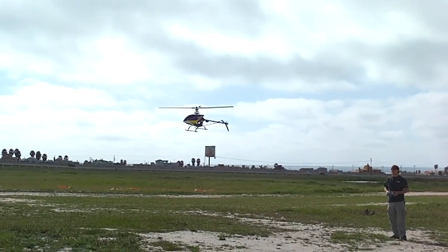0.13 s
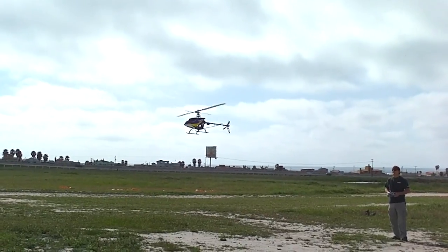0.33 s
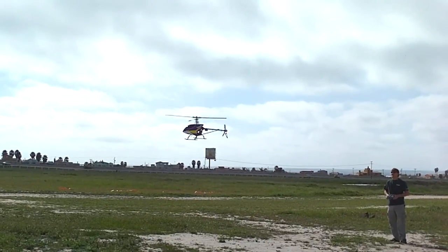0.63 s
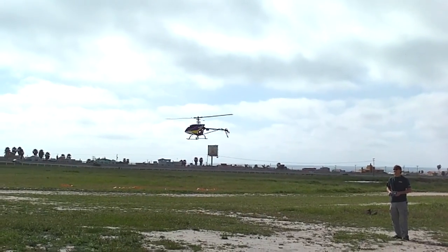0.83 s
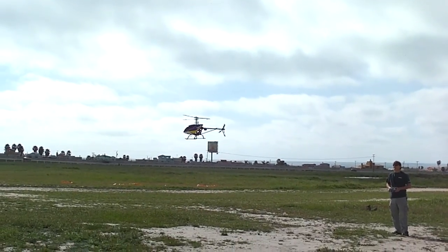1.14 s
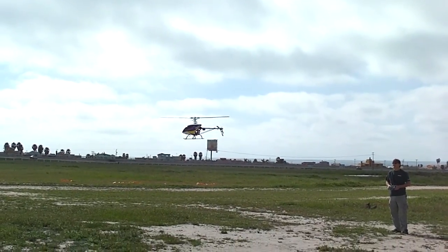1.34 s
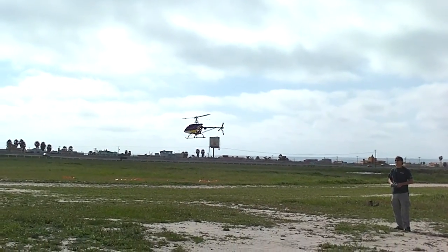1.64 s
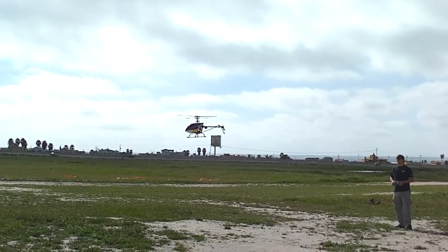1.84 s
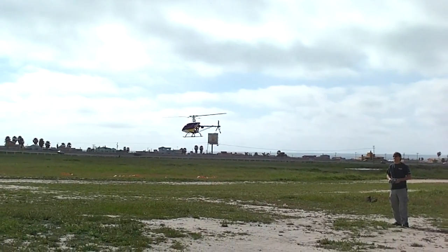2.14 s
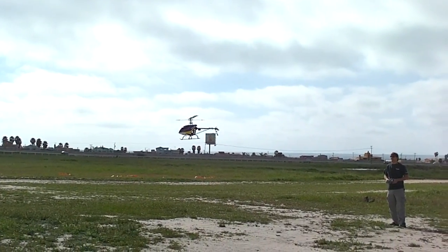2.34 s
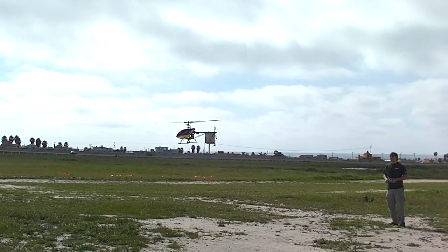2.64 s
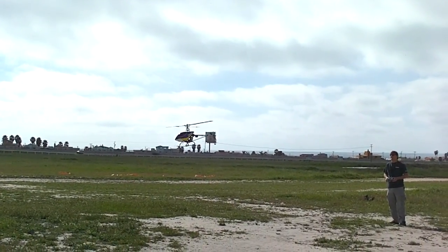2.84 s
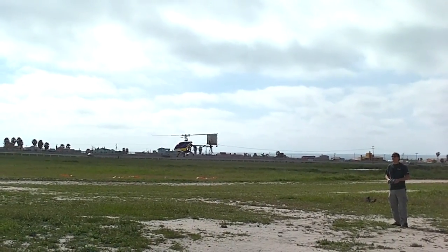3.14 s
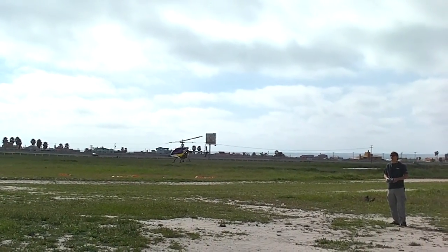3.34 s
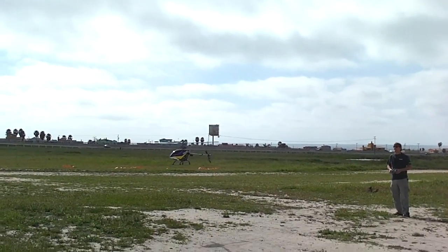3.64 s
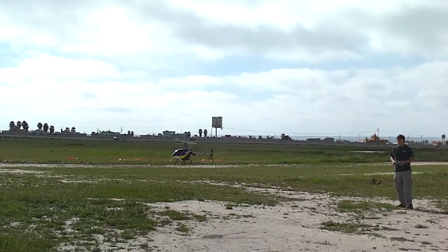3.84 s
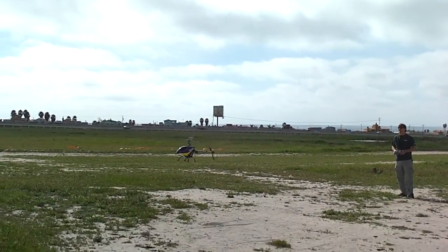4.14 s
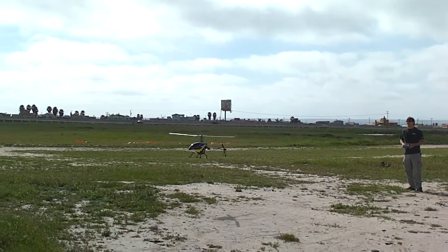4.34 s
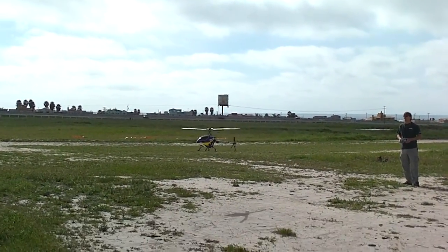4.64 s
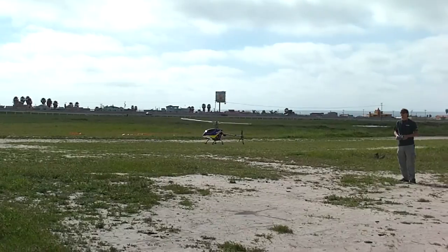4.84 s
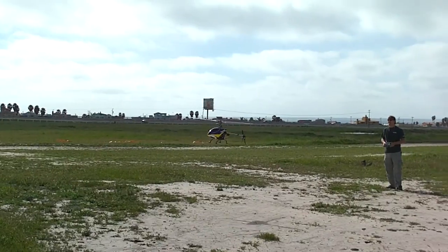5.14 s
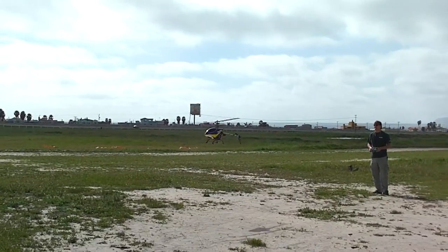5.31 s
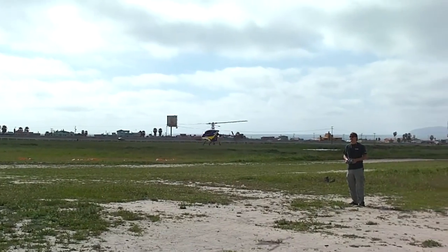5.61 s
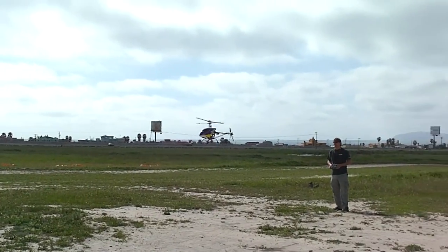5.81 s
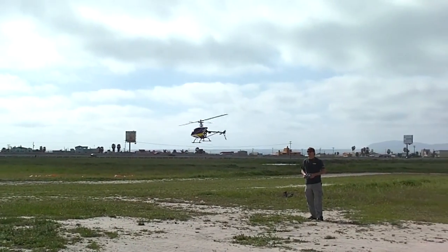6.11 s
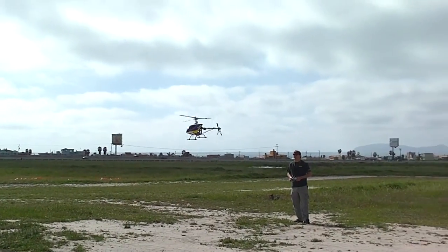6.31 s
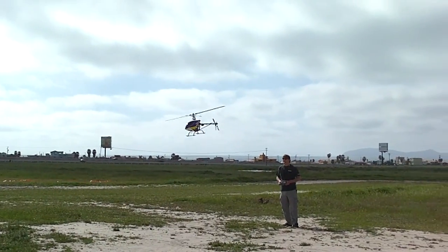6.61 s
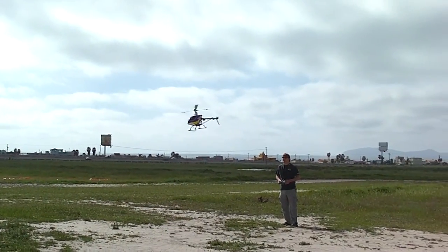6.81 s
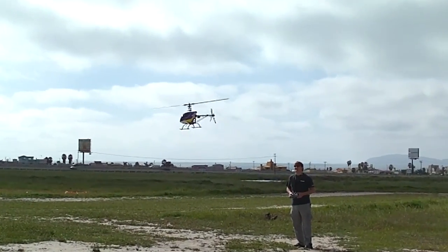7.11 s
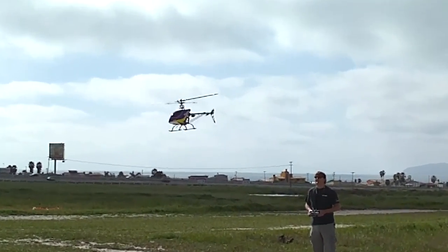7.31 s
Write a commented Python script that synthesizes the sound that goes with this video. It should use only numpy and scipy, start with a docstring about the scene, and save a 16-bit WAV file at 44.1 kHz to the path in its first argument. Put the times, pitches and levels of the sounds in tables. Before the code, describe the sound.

An electric model helicopter whines and throbs over an open field, with light wind and a few hard knocks on the microphone.

```python
"""An electric model helicopter hovers over an open field while wind buffets a mono microphone.
Its pinion whines against the main gear, throbbing with every rotor turn. Near 3 s the camera is knocked.
The craft sinks almost to the grass: from about 4 s the unloaded rotor speeds up and its blades whistle,
and at 5 s a hard knock overloads the input. The rotor slows and the whistle fades as the craft climbs
again; two more hard knocks fall near 7 s."""
import sys
import numpy as np
from scipy import signal
from scipy.fft import rfft, irfft
from scipy.io import wavfile

SR = 44100
rng = np.random.default_rng(int(sys.argv[2]) if len(sys.argv) > 2 else 0)


def to_wav(s):
    """Save 16-bit WAV."""
    ch = np.atleast_2d(s).T  # columns
    pcm = np.round(np.clip(ch, -1, 1) * 32767)  # PCM
    wavfile.write(sys.argv[1], SR, pcm.astype(np.int16))


N = 328986
TIME = np.arange(N) / SR
GEAR_TEETH, PINION_TEETH = 170, 15

# Spectra of wind rumble, rotor wash and rotor hiss: frequency_hz, relative_density_db
WIND_SPECTRUM = [(10, -2), (30, -10), (60, 1), (130, 1), (190, -6.5), (300, -7.5), (600, -24), (1500, -23),
                 (5000, -77)]
WASH_SPECTRUM = [(150, -10), (300, -13.5), (450, -8), (600, 3.5), (820, 2.5), (1000, -7.5), (1250, -18.5),
                 (1750, -23), (2100, -11), (2800, -34), (3400, -41)]
HISS_SPECTRUM = [(1500, -19), (2100, -2.5), (3000, -10), (3450, -12.5), (3750, 1), (4500, -0.5),
                 (5900, 10.5), (6500, 0), (7200, 5.5), (9500, -1.5), (11500, -1.5), (12500, -2),
                 (14200, -12), (15300, -7)]
# Gusts on the microphone: start_s, level_db, rise_s, decay_s, cutoff_hz
WIND_GUSTS = [(0, -33, 0.0054, 0.11, 190), (0.139, -30.5, 0.03, 0.049, 240),
              (2.219, -33, 0.054, 0.061, 177), (2.45, -33, 0.015, 0.068, 230), (2.9, -35, 0.023, 0.11, 330),
              (3.017, -12.5, 0.0031, 0.008, 360), (3.463, -28.5, 0.0051, 0.01, 400),
              (4.779, -37, 0.031, 0.066, 130)]
# Dull pushes on the camera: crest_s, level_db, pitch_hz, half_length_s
CAMERA_BUMPS = [(2.9798, -14, 230, .0035), (3.0171, -5, 240, .0019), (5.0365, -14, 210, .0025),
                (6.8395, -13, 190, .0025)]
# Modes of the camera body: pitch_hz, relative_db, base_t60_s
BODY_MODES = [(521, -14, 0.034), (763, -13.5, 0.03), (890, -7.5, 0.021), (1237, -8.5, 0.037),
              (1380, -28, 0.12), (1800, -14.5, 0.053), (2275, 5, 0.019), (2220, -24, 0.15),
              (2560, -2, 0.011), (2964, -6, 0.021), (3370, 4, 0.019), (3750, -31, 0.15), (3747, 3.5, 0.014),
              (4590, 0.5, 0.0063), (4980, -2, 0.0054), (6800, -33, 0.0067), (8400, -5, 0.01)]
# Blows on the camera: start_s, gain_db, ring_factor, cutoff_hz, rattle_s, low_mode_gain_db
CAMERA_KNOCKS = [(2.9053, -19, 0.27, 1230, .001, -2), (2.9793, -3, 0.25, 13000, 0.00062, 2.5),
                 (3.0166, -7, 0.17, 4500, 0.013, 5), (4.367, -29, 0.55, 1400, .001, 3),
                 (4.5863, -27.5, 0.92, 1100, 0.00081, 10.5), (5.0337, 9.5, 0.54, 3640, 0.00041, -4.5),
                 (6.837, 5, 0.71, 4060, 0.0012, 2.5), (7.339, 5.5, 0.93, 5070, .002, 4)]
# Main rotor speed, rising as the load comes off: time_s, turns_per_s
ROTOR_SPEED = [(0.0, 16.044), (0.3, 15.78), (1.0, 15.766), (2.0, 15.715), (2.75, 15.749), (3.25, 16.037),
               (3.87, 16.273), (4.25, 16.692), (4.75, 16.856), (5.35, 16.463), (6.3, 15.907),
               (6.85, 15.851), (7.46, 15.628)]
# Hum partials of main and tail rotor: cycles_per_rotor_turn
ROTOR_ORDERS = (4, 6, 8, 9, 18, 27, 36, 40.5)
# Their strengths: level_db
ROTOR_ORDER_LEVELS = [-60, -54.5, -57.5, -54.5, -59.5, -63, -68, -60.5]
# Rotor wash, following the lift: time_s, relative_db
WASH_ENVELOPE = [(0.0, -39.5), (0.62, -42), (2.51, -43.5), (3.03, -40), (4.78, -47), (5.74, -47),
                 (6.42, -42.5), (7.08, -45.5), (7.46, -43.5)]
# Blade whistles: loudest_at_turns, highest_at_turns, top_pitch_hz, width_hz, relative_db
BLADE_WHISTLES = [(.11, .17, 6100, 170, 3.5), (.58, .65, 6450, 200, 2.5), (.66, .7, 7800, 900, -2),
                  (.3, .3, 7200, 800, -5)]
# Whistling of the unloaded blades: time_s, gain_db
WHISTLE_ENVELOPE = [(4.15, -60), (4.3, -37), (4.45, -32.5), (4.75, -34.5), (5, -31), (5.25, -30),
                    (5.4, -37), (5.7, -42), (6.3, -45), (6.6, -60)]
# Partials of the uneven pinion: cycles_per_motor_turn
PINION_ORDERS = (3, 12, 13, 16, 27, 28, 29, 31, 42, 43, 44, 45, 46, 47, 48, 54, 57, 59, 61, 74, 75)
# Their strengths: relative_db
PINION_ORDER_LEVELS = [-26.5, -25.5, -24.5, -30.5, -13, -16.5, -7, -28, -16.5, -11.5, -6, -5.5, -11, -23,
                       -11, -34, -12, -14, -10.5, -14, -10.5]
# Friction bands around mesh harmonics 1 to 5: width_hz, relative_db
FRICTION_BANDS = [(343, -6.5), (710, -8), (1090, -2.5), (830, -11.5), (450, -14)]
# Gear rasp, weaker as the craft sinks: time_s, relative_db
RASP_ENVELOPE = [(0.0, -28.5), (0.29, -28), (2.66, -33.5), (2.83, -29.5), (3.16, -31.5), (3.49, -30),
                 (4.15, -34.5), (5.11, -34.5), (5.4, -33), (7.08, -30), (7.46, -28.5)]
# The sideband just below the mesh tone: time_s, level_db
SIDEBAND_ENVELOPE = [(0.0, -40), (0.1, -46), (0.95, -37.5), (1.45, -54.4), (3.25, -35.5), (3.81, -42.8),
                     (4.01, -36), (5.06, -48.5), (5.86, -38.5), (6.21, -48.5), (7.46, -64)]
# Tones of the whine: multiple_of_mesh_frequency
WHINE_HARMONICS = (1, 2, 4)
# Each of the three beams its own way as the craft turns: time_s, relative_db
LOW_ENVELOPE = [(0.0, -30.5), (0.15, -33), (1.1, -24.5), (1.75, -32.5), (2.6, -31.5), (2.9, -27),
                (4.21, -34), (4.41, -28), (5.21, -40), (5.36, -30.5), (5.71, -27.5), (6.06, -44.5),
                (6.16, -35), (6.41, -31.5), (7.46, -32)]
MID_ENVELOPE = [(0.0, -24.5), (0.7, -26.5), (0.85, -37.5), (1.0, -27), (1.15, -24), (1.45, -33.5),
                (1.9, -27.5), (3.1, -28), (3.45, -23.4), (3.65, -31), (3.86, -25.5), (4.06, -41),
                (4.26, -33.2), (4.61, -34), (5.01, -39.5), (5.11, -33), (6.56, -25), (7.46, -29.5)]
HIGH_ENVELOPE = [(0.0, -52), (0.95, -43.8), (2.35, -49), (3.35, -37), (4.11, -42), (4.41, -55),
                 (4.66, -50.1), (4.96, -70), (5.31, -40), (6.66, -36.3), (7.46, -53)]
# Pulsing of the lowest mesh tone with the angle of view: time_s, swing_db, loudest_at_turns
LOW_THROB = [(0, 6, 0.21), (.8, 3, 0.09), (1.5, 5, .15), (2.8, 2.5, -0.078), (3.6, 5.5, 0.16),
             (4.3, 4, -.22), (5.7, 3, -0.2), (6.3, 4, 0.25), (7.46, 7, 0.18)]


def gain_of(db):
    """Amplitude grows tenfold with every 20 dB."""
    return 10 ** (np.asarray(db) / 20)


def unit_rms(x):
    """Normalisation to unit mean power."""
    return x / np.sqrt(np.mean(abs(x) ** 2) + 1e-20)


def curves(rows):
    """Linear interpolation of a time table's columns at every sample."""
    times, *columns = np.transpose(rows)
    return [np.interp(TIME, times, column) for column in columns]


def add(mix, start_s, sound):
    """Superposition of a sound on the mix from start_s."""
    part = mix[max(round(start_s * SR), 0):][:len(sound)]
    part += sound[:len(part)]


def noise(spectrum):
    """Spectral shaping of white noise, rms 1."""
    hz, db = np.transpose(spectrum)
    shape = gain_of(np.interp(np.log(np.fft.rfftfreq(N, 1 / SR) + 1), np.log(hz), db))
    return unit_rms(irfft(rfft(rng.standard_normal(N)) * shape, N))


def lowpass(x, hz, order=2):
    """Butterworth roll-off above hz: 6 dB an octave for each order."""
    return signal.sosfilt(signal.butter(order, hz, fs=SR, output="sos"), x)


def drift(hz, step=64):
    """Random fluctuation band-limited to about hz, rms 1."""
    count = N // step + 2
    frequencies = np.fft.rfftfreq(count, step / SR)
    slow = irfft(rfft(rng.standard_normal(count)) / np.sqrt(1 + (frequencies / hz) ** 4), count)
    return np.interp(np.arange(N) / step, np.arange(count), unit_rms(slow))


def narrowband(cycles, width_hz):
    """Random modulation broadens a tone into a band of noise, rms 1."""
    envelope = lowpass(rng.standard_normal(N) + 1j * rng.standard_normal(N), width_hz / 2)
    return unit_rms((envelope * np.exp(2j * np.pi * cycles)).real)


def throb(turns, turn_db, turn_at, blade_db, blade_at):
    """Amplitude modulation by each turn and each of two blades, rms 1; the crests are placed in turns."""
    per_turn = turn_db * np.cos(2 * np.pi * (turns - turn_at))
    per_blade = blade_db * np.cos(4 * np.pi * (turns - blade_at))
    return unit_rms(gain_of(per_turn + per_blade))


def wind(steady_db=-42, lumps_db=0.66):
    """Turbulent pressure on the microphone: a lumpy rumble, and gusts that decay exponentially."""
    out = gain_of(steady_db + lumps_db * drift(hz=14)) * noise(WIND_SPECTRUM)
    t = TIME[:SR // 2]
    for start_s, db, rise_s, decay_s, cutoff_hz in WIND_GUSTS:
        eddies = lowpass(rng.standard_normal(len(t)), cutoff_hz)
        eddies = signal.sosfilt(signal.butter(1, cutoff_hz / 5, "high", fs=SR, output="sos"), eddies)
        shape = np.minimum(t / rise_s, 1) ** 2 * np.exp(-np.maximum(t - rise_s, 0) / decay_s)
        add(out, start_s, gain_of(db) * unit_rms(eddies * shape) * np.sqrt(np.mean(shape ** 2)))
    return out


def bumps():
    """Elastic flexure: a soft push bends the camera body for a cycle or two."""
    out = np.zeros(N)
    for crest_s, db, hz, half_length_s in CAMERA_BUMPS:
        t = TIME - crest_s
        out += gain_of(db) * np.exp(-(t / half_length_s) ** 2) * np.cos(2 * np.pi * hz * t)
    return out


def knocks(rattle_share=0.34, crack_db=-9):
    """Impact excitation: a blow cracks, rattles and rings the camera's modes; soft ones sound duller."""
    out, t = np.zeros(N), TIME[:SR // 4]
    for start_s, db, ring, cutoff_hz, rattle_s, low_mode_db in CAMERA_KNOCKS:
        body = np.zeros(len(t))
        for hz, mode_db, base_t60_s in BODY_MODES:
            envelope = gain_of(mode_db + low_mode_db * (hz < 1100) - 60 * t / (base_t60_s * ring))
            body += envelope * np.sin(2 * np.pi * hz * t) / np.hypot(1, (hz / cutoff_hz) ** 2)
        force = rng.standard_normal(len(t)) * np.exp(-t / rattle_s)
        force *= rattle_share / np.linalg.norm(force)
        force[0] += 1  # the blow itself
        band = signal.butter(2, (300, cutoff_hz), "band", fs=SR, output="sos")
        crack = unit_rms(signal.sosfilt(band, rng.standard_normal(len(t))))
        crack *= gain_of(crack_db) * np.exp(-t / (0.005 * ring))
        add(out, start_s, gain_of(db) * (signal.fftconvolve(force, body)[:len(t)] + crack))
    return out


def controller(switching_hz=11988, level_db=-62):
    """Periodic switching makes the motor's speed controller sing faintly."""
    tone = (1 + 0.4 * drift(hz=5)) * np.sin(2 * np.pi * switching_hz * TIME)
    return gain_of(level_db) * unit_rms(tone)


def rotor_hum(turns):
    """Periodic blade passage gives partials at multiples of the rotor speed."""
    out = np.zeros(N)
    for order, db in zip(ROTOR_ORDERS, ROTOR_ORDER_LEVELS):
        waver = 1 + 0.61 * drift(hz=5.2)
        out += gain_of(db) * unit_rms(waver * np.cos(2 * np.pi * (order * turns + rng.random())))
    return out


def rotor_wash(turns):
    """Turbulence in the air moved by the rotor gives broadband noise, modulated by blade passage."""
    rasp_db = curves(RASP_ENVELOPE)[0]
    hiss = gain_of(-36 + 0.05 * (rasp_db - rasp_db.mean())) * noise(HISS_SPECTRUM)
    wash = gain_of(curves(WASH_ENVELOPE)[0] + 0.58) * noise(WASH_SPECTRUM)
    swish = throb(turns, turn_db=0.84, turn_at=0.51, blade_db=2.0, blade_at=0.28)
    return swish * (hiss + wash)


def blade_whistle(turns, doppler=0.11, focus=5.2):
    """Doppler shift: each blade's whistle sweeps up as it swings toward the listener."""
    out = np.zeros(N)
    for loudest_at, highest_at, top_hz, width_hz, db in BLADE_WHISTLES:
        sweep = doppler * (np.cos(2 * np.pi * (turns - highest_at)) - 1)
        pitch_hz = top_hz * (1 + sweep + 0.024 * drift(hz=11))
        beam = np.exp(focus * (np.cos(2 * np.pi * (turns - loudest_at)) - 1))
        out += gain_of(db) * beam * narrowband(np.cumsum(pitch_hz) / SR, width_hz)
    return out * gain_of(curves(WHISTLE_ENVELOPE)[0])


def teeth_passed(turns, runout_teeth=0.14):
    """Phase modulation: the off-centre main gear advances and retards the mesh once a turn."""
    backlash = 0.02 * drift(hz=30)
    return GEAR_TEETH * turns + runout_teeth * np.sin(2 * np.pi * (turns - 0.74)) + backlash


def pinion_partials(teeth, waver=0.65):
    """Unequal pinion teeth repeat every motor turn, giving harmonics of the motor speed."""
    motor_angle = 2 * np.pi * teeth / PINION_TEETH
    out = np.zeros(N)
    for order, db in zip(PINION_ORDERS, PINION_ORDER_LEVELS):
        amplitude = 1 + waver * drift(hz=38)
        phase = order * motor_angle + 2 * np.pi * rng.random() + waver * drift(hz=3.8)
        out += gain_of(db) * unit_rms(amplitude * np.cos(phase))
    return out


def tooth_friction(teeth):
    """Friction broadens each mesh harmonic; it bites once a motor turn, ripples 12 times a gear turn."""
    bands = sum(gain_of(db) * narrowband(harmonic * teeth, width_hz)
                for harmonic, (width_hz, db) in enumerate(FRICTION_BANDS, 1))
    bite = 1 + 0.26 * np.exp(0.91 * np.cos(2 * np.pi * teeth / PINION_TEETH))
    ripple = 1 + 0.34 * np.cos(2 * np.pi * 12 * teeth / GEAR_TEETH)
    return bands * unit_rms(bite * ripple)


def gear_rasp(turns, teeth):
    """Transmission loss in the canopy takes the highest overtones from the rotor-chopped gear noise."""
    chop = throb(turns, turn_db=0.4, turn_at=1.0, blade_db=1.27, blade_at=0.16)
    flutter = gain_of(1.2 * drift(hz=21))
    transmitted = lowpass(pinion_partials(teeth) + tooth_friction(teeth), hz=13150, order=10)
    return gain_of(curves(RASP_ENVELOPE)[0] - 2.03) * chop * flutter * transmitted


def pinion_sideband(teeth, waver=0.54):
    """Modulation by the pinion puts a sideband at the mesh frequency less the motor speed."""
    phase = 2 * np.pi * teeth * (1 - 1 / PINION_TEETH)
    tone = unit_rms((1 + waver * drift(hz=27.6)) * np.cos(phase))
    return gain_of(curves(SIDEBAND_ENVELOPE)[0]) * tone


def unloading(threshold_turns_per_s=16.35, width_turns_per_s=0.12):
    """A rotor races when its load is removed: 0 under load, 1 well above the threshold speed."""
    excess_speed = curves(ROTOR_SPEED)[0] - threshold_turns_per_s
    return 0.5 + 0.5 * np.tanh(excess_speed / width_turns_per_s)


def gear_whine(turns, teeth, flutter_db=1.1):
    """Periodic tooth contact radiates mesh harmonics, chopped by the rotor, fluttering in the downwash."""
    swing_db, loudest_at = curves(LOW_THROB)
    low_throb = throb(turns, swing_db, loudest_at, 0.24 * swing_db, loudest_at)
    upper_throb = throb(turns, turn_db=1.5, turn_at=0.25, blade_db=2, blade_at=0.1)
    low_roughness = 0.14
    upper_roughness = 0.16 + 0.42 * unloading()  # slack teeth roughen the upper tones
    tones = [(curves(LOW_ENVELOPE)[0] + 0.27, low_throb, low_roughness),
             (curves(MID_ENVELOPE)[0] + 1.02, upper_throb, upper_roughness),
             (curves(HIGH_ENVELOPE)[0] + 2.5, upper_throb, upper_roughness)]
    out = np.zeros(N)
    for harmonic, (db, swell, roughness) in zip(WHINE_HARMONICS, tones):
        flutter = gain_of(flutter_db * drift(hz=21))
        # no two teeth meet alike
        grain = 1 + roughness * (drift(hz=170, step=16) + 1j * drift(hz=170, step=16))
        tone = np.sqrt(2) * (grain * np.exp(2j * np.pi * harmonic * teeth)).real
        out += gain_of(db) * swell * flutter * tone
    return out


def helicopter():
    """Mechanical coupling: one rotor speed governs the gears, the blades and the air they move."""
    turns = np.cumsum(curves(ROTOR_SPEED)[0]) / SR
    teeth = teeth_passed(turns)
    gears = gear_rasp(turns, teeth) + pinion_sideband(teeth)
    air = rotor_wash(turns) + rotor_hum(turns)
    return air + gears + gear_whine(turns, teeth) + blade_whistle(turns)


def scene():
    """Superposition in a free field, with no echo; one microphone feeds both channels."""
    return np.tile(helicopter() + wind() + knocks() + bumps() + controller(), (2, 1))


def record(dry):
    """Saturation and band limiting: the input clips at full scale, then passes a low-pass filter."""
    edge_hz = 15550
    band_limit = signal.firwin(511, edge_hz, window=("kaiser", 8), fs=SR)
    return signal.oaconvolve(np.clip(dry, -1, 1), band_limit[None], "same")


dry = scene()
out = record(dry)
to_wav(out)
```